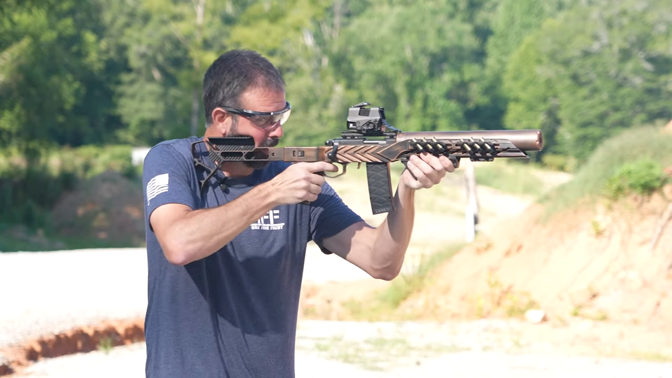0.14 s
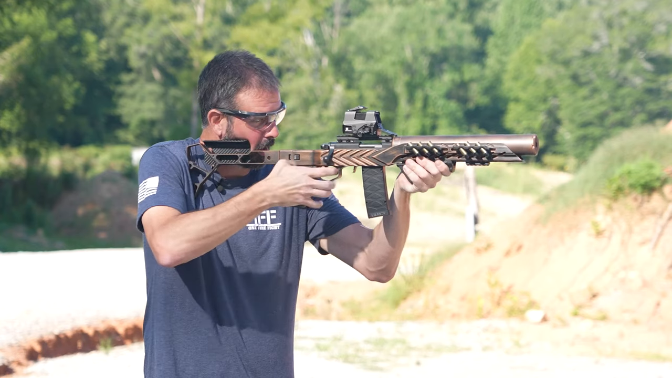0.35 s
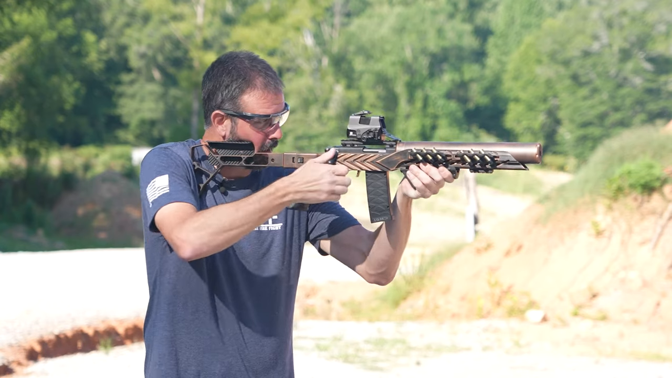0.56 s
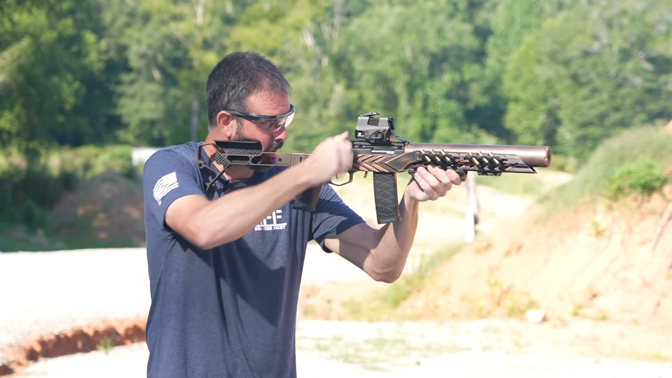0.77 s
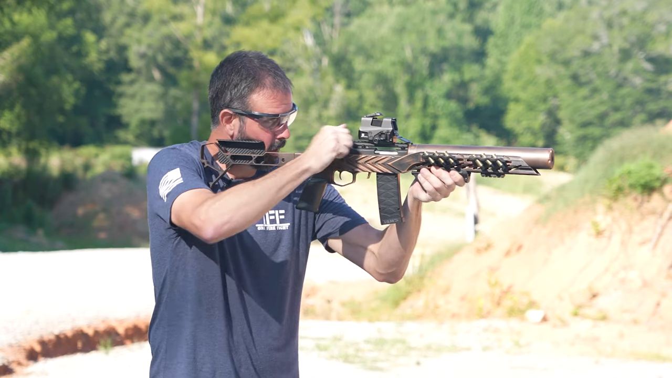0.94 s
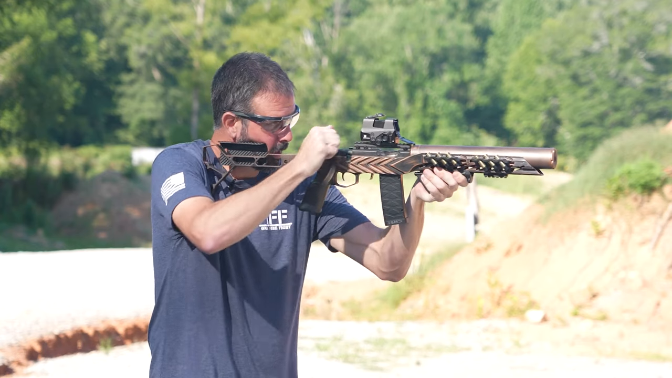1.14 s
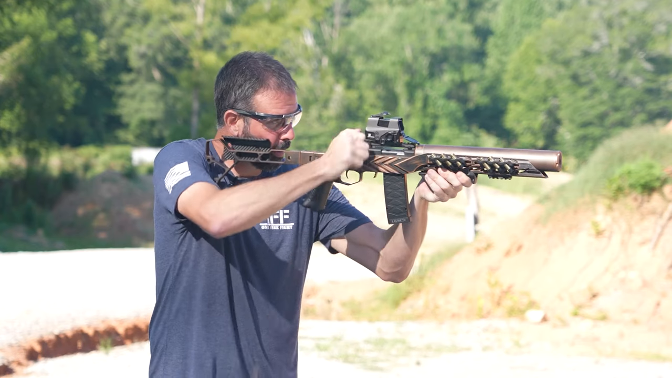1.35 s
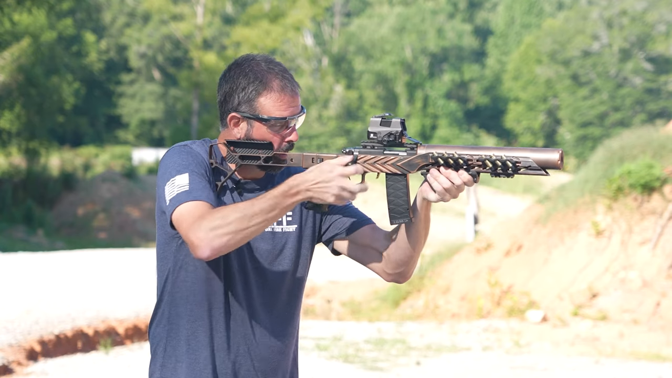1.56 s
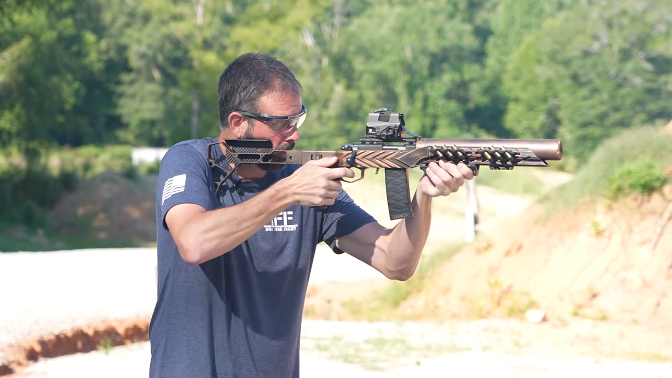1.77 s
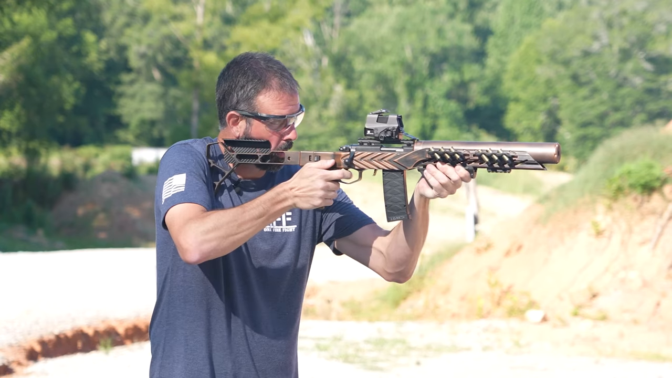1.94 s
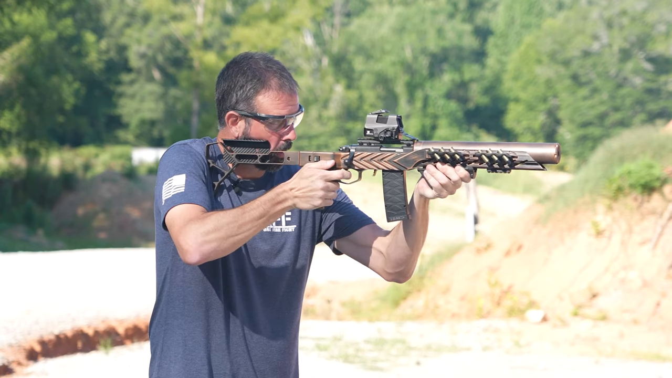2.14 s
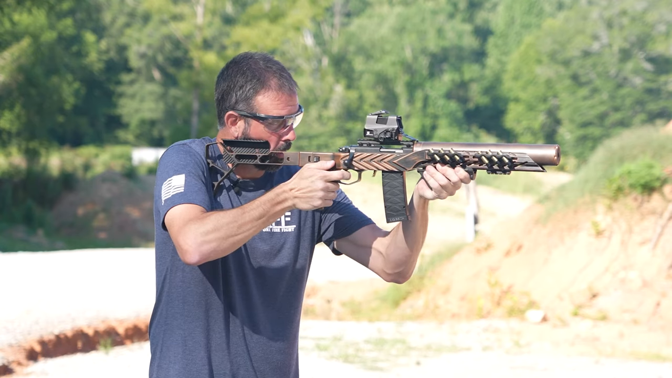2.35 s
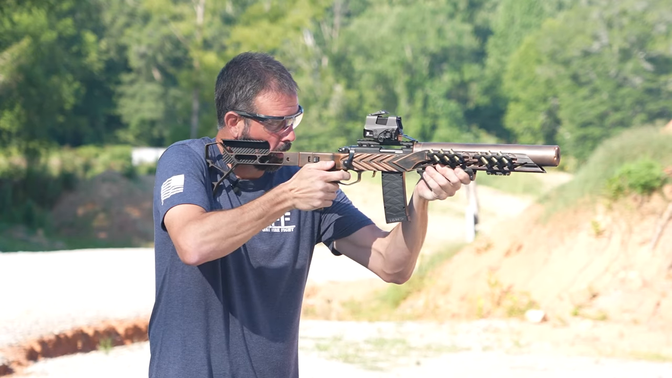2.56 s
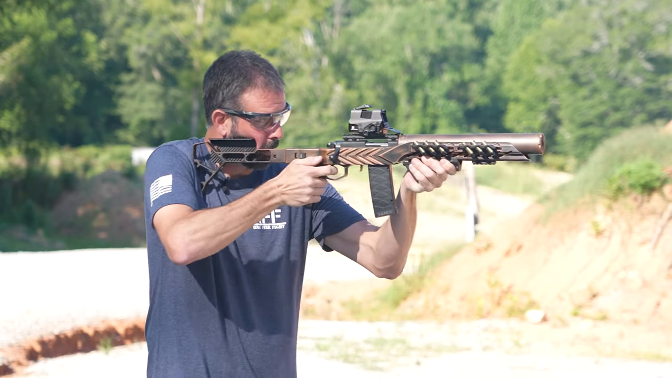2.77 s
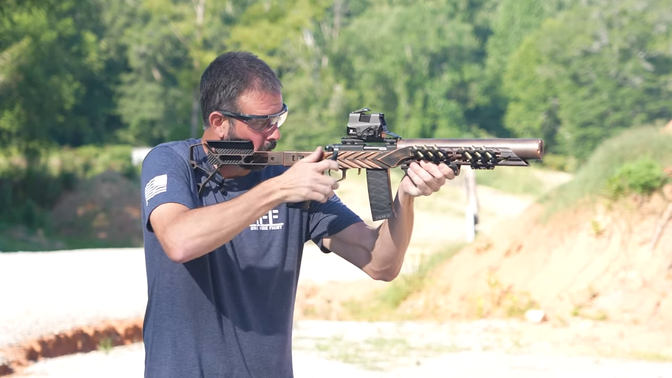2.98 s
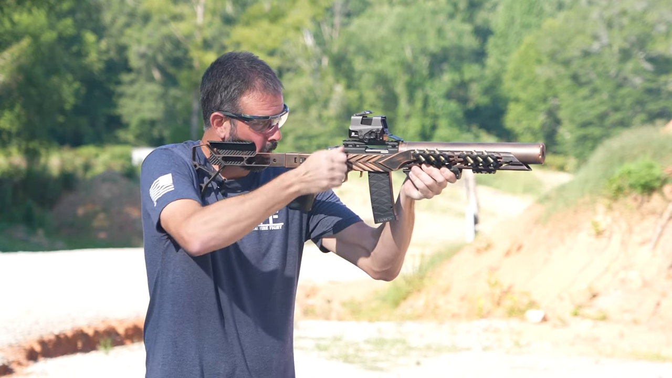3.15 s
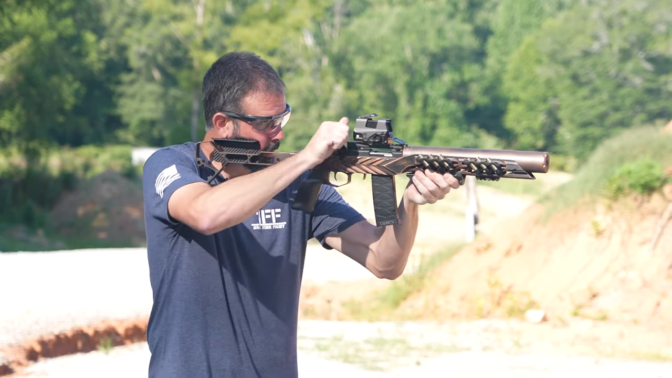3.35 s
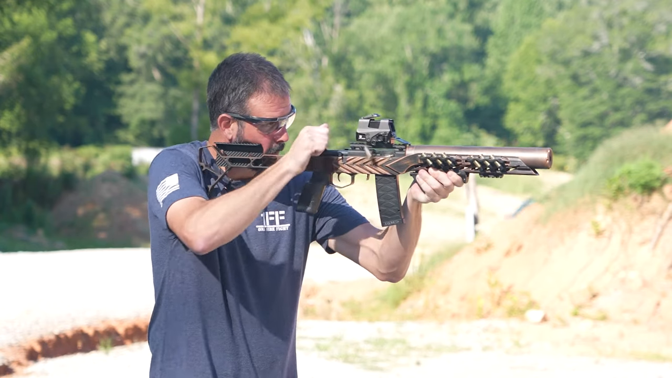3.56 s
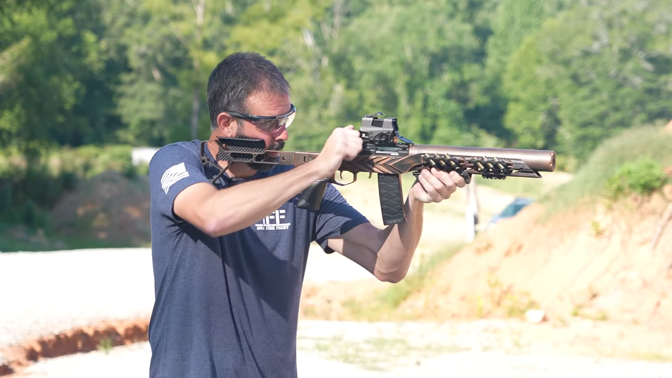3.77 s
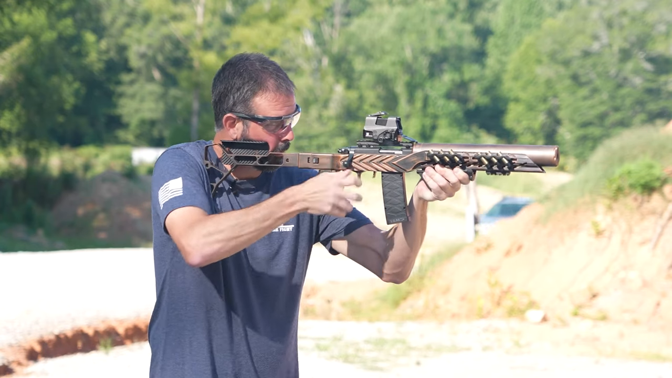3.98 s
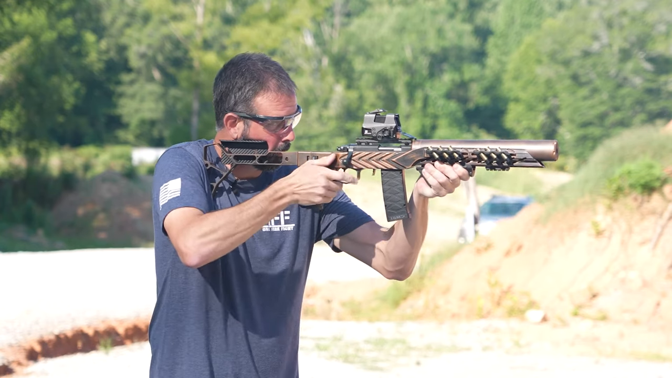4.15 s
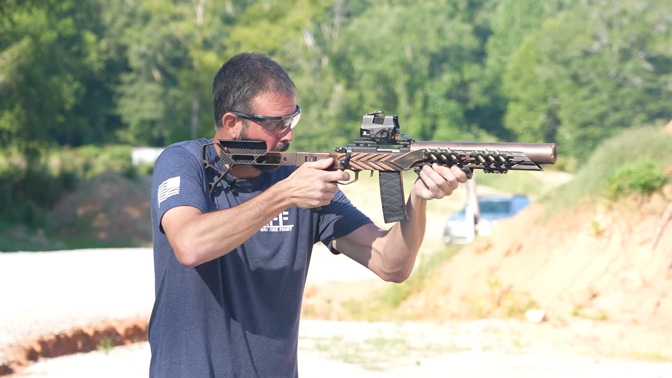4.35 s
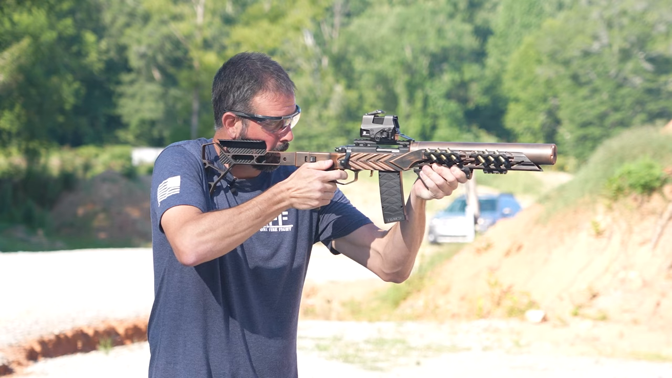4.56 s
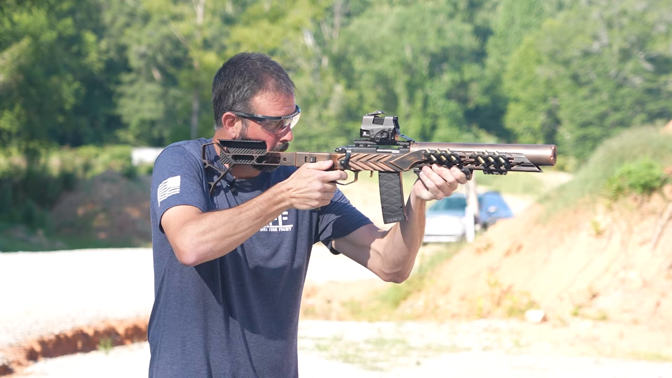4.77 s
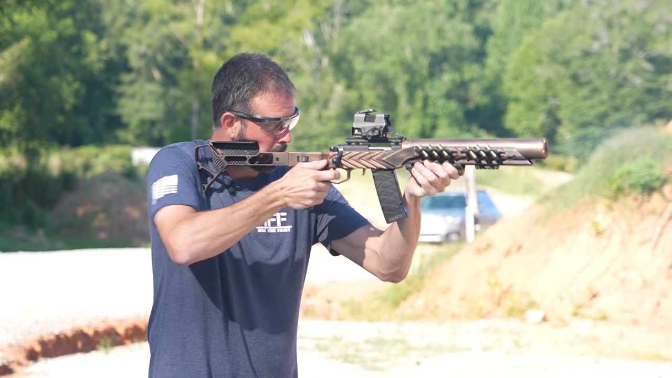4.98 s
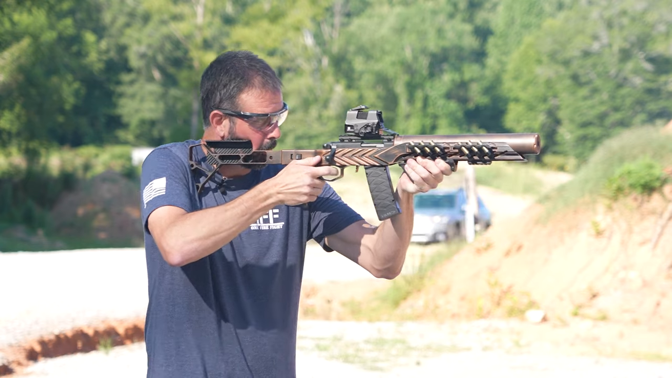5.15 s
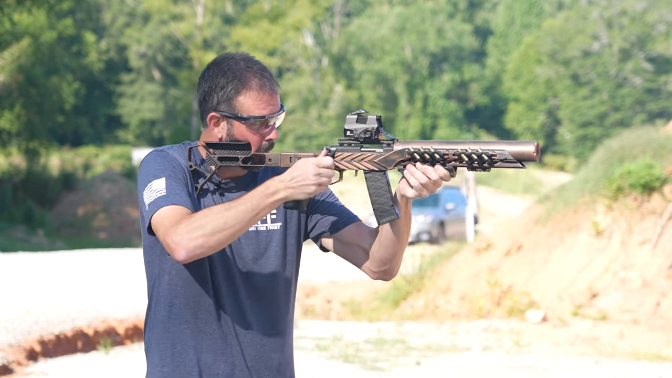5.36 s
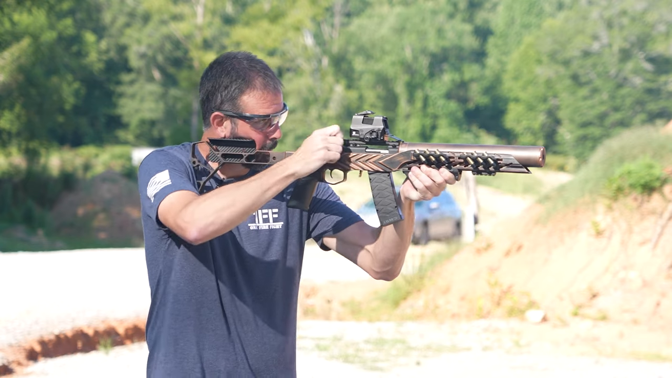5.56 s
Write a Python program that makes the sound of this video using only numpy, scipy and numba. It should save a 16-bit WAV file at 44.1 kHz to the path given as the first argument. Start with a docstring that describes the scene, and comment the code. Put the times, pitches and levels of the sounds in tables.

```python
"""Suppressed rifle, steel plate

A bolt-action rifle fires three times on an outdoor range; each gas blast hisses back from earth banks.
The bullet cracks on a hanging plate, which rings as it swings. The worked bolt scrapes, clicks and
rings the action; the spent case clinks as it lands. A bird, distant traffic and insects lie underneath.
A limiter pumps after each blow."""
import sys
import numpy as np
from scipy import signal
from scipy.fft import rfft, irfft, next_fast_len
from scipy.io import wavfile
from scipy.ndimage import uniform_filter1d
from numba import njit

SR = 44100
rng = np.random.default_rng(int(sys.argv[2]) if len(sys.argv) > 2 else 0)


def to_wav(s):
    """Save 16-bit WAV."""
    ch = np.atleast_2d(s).T  # columns
    pcm = np.round(np.clip(ch, -1, 1) * 32767)  # PCM
    wavfile.write(sys.argv[1], SR, pcm.astype(np.int16))


N = 247842

# reports: start_s, blast_db, blast_t60_s, thump_db, slap_db, near_echo_db, far_hiss_db, far_t60_s
SHOTS = [(0.048, 5.5, 0.16, -1, -6.5, 5.5, -14, 1.2), (2.6854, 7, 0.068, -20, -33, -4, -18, 0.74),
         (5.031, 6.5, 0.093, -17, -20, -3.5, -19.5, 0.94)]
# bullet strikes: start_s, crack_db, wash_db, wash_t60_s, late_echo_db, late_t60_s
STRIKES = [(0.231, 15, -21, 1.57, -15.5, 0.49), (2.868, 6.5, -21.5, 1.65, -16.5, 0.47),
           (5.213, 7.5, -21, 1.95, -3, 0.21)]
# three long plate partials: pitch_hz
LONG_HZ = [872.7, 1333.3, 3638.]
# lowest long partial as the plate swings, one list per strike: time_s, level_db
SWINGS = [
    [(.231, -20), (.87, -19), (1.15, -25.5), (1.4, -27.5), (1.6, -33.5), (1.9, -38), (2.68, -46),
     (2.86, -55)],
    [(2.868, -16), (3.0, -12), (3.15, -14), (3.45, -9.5), (3.65, -22.5), (3.88, -24), (4.15, -32),
     (5.2, -41)],
    [(5.212, -16), (5.3, -12.5), (5.5, -13.5), (5.62, -11)],
]
# upper two long partials: rise_db, t60_s, tail_db, tail_t60_s, level_db per strike
BLOOMS = [(16, 1.254, -25.5, 3., -9, -13.5, -11), (4.1, 0.5, -39.5, 1.8, -3, -5.5, -7.5)]
# short plate partials: pitch_hz
SHORT_HZ = [2047, 2142, 2394, 2701, 4198, 4511, 4604, 4958, 5401, 5880, 6605, 6704, 9738, 13220]
# their decay and beating: t60_s, beat_hz, level_db per strike
SHORT_PARTIALS = [(0.63, 4.1, -22.5, -12.5, -15), (0.8, 1.7, -12, -18, -23), (0.36, 1.2, -7.5, -13.5, -17),
                  (0.85, 2, -6, -21.5, -12.5), (0.79, 5., -19, -10, -16), (0.19, 3.4, -5, -15, -24),
                  (0.77, 2.5, -17, -24.5, -12.5), (0.82, 4.9, -24, -15.5, -12.5),
                  (0.58, 7.5, -16, -16, -16.5), (0.56, 8., -21.5, -12, -11), (0.61, 1.4, -28, -23, -23),
                  (0.99, 4.5, -26, -23, -23), (0.69, 6., -26, -30.5, -30), (.6, 1.6, -40, -38, -40)]

# scrape left by each working of the bolt: start_s, level_db
HANDLING = [(0.838, -32), (3.27, -27.5)]
# bolt strokes: peak_s, scrape_db, hiss_db
STROKES = [(.93, -42, -52), (1.05, -25, -35), (1.3, -28, -51), (3.53, -16, -51), (3.77, -27.5, -42),
           (5.58, -34, -44.5)]
# cloth on the moving arm: start_s, length_s, level_db
RUSTLES = [(.84, 0.99, -58), (3.25, 0.87, -56.5), (4.056, 0.164, -52.5)]
# clicks of bolt, handle and cartridge: start_s, level_db, relative_treble_db
CLICKS = [(.705, -38, 8), (0.7256, -3, -14.5), (0.825, -23.5, -14), (0.8789, -7, 8.5), (.886, 0.5, 2),
          (0.907, 3.5, -7.5), (.954, -20, -22), (1.0014, -7.5, -38.5), (1.0095, -5, -8), (1.0185, -9, -6),
          (1.035, -7.5, 3), (1.044, -4, -6), (1.054, -6, -29), (1.0633, -2, -28), (1.069, 3, -14),
          (1.0759, 12.5, 0), (1.13, -18, -36), (1.2141, -18, -24), (1.261, -13.5, -22.5), (1.28, -14, -14),
          (1.288, -11, -25), (1.294, 4, -8.5), (1.307, 0.5, -21.5), (1.312, 1, -14), (1.3193, 1, -2),
          (1.3353, 13, -3), (1.419, -25, -33), (1.4848, -14, -1), (1.4915, 2.5, -25.5), (1.555, -0.5, -2.5),
          (1.646, -26, -37), (1.7049, -29.5, 3.5), (1.7439, -40.5, -15), (1.812, -40, 5),
          (1.8703, -44.5, -22), (1.879, -51, 6), (1.889, -50.5, 3), (1.954, -54, 4), (3.252, -10, -23),
          (3.3507, -6, 3), (3.3608, 3.5, 1.5), (3.3959, 1, -12), (3.455, -11, -11), (3.474, 1, -13),
          (3.488, -9, -4), (3.5057, -15, 5), (3.5094, 2, -2.5), (3.524, 3, -9), (3.532, -1.5, -17),
          (3.543, 12, -3.5), (3.592, -9.5, -36.5), (3.674, -20.5, -30), (3.7066, -8.5, -27),
          (3.724, -13.5, -29), (3.7389, 1, -12), (3.7505, -13, -15.5), (3.764, -4, -17), (3.7684, 2.5, -6),
          (3.773, -2.5, -15), (3.794, 6.5, -1.5), (3.8352, -32, -17), (3.916, -17.5, -5),
          (3.921, -1.5, -19), (3.9765, 1, -1.5), (4.0688, -30, -35), (4.1905, -37, 5), (4.383, -48, -24),
          (4.6, -60, 8), (5.425, -11.5, -37), (5.55, -14, 9), (5.559, 8.5, -1.5), (5.572, -7, -18),
          (5.5772, 0, -9)]
# spectral peaks of the bolt noise: centre_hz, width_hz, relative_db
MID_BANDS = [(810, 270, -10), (1024, 130, -1), (2180, 980, -1.5), (2652, 230, 9.5), (3720, 1200, -6),
             (4074, 1200, -31)]
TREBLE_BANDS = [(8660, 3000, -5), (11020, 1700, 10.5), (14000, 6000, 2)]
# spent case bouncing on gravel: start_s, end_s
CASE_BOUNCES = [(1.6, 2.1), (4.2, 4.4)]
# modes of action and spent case: pitch_hz
METAL_HZ = [748, 1710, 2132, 2710, 2935, 3795, 4370, 4474, 5190, 5490, 6178, 7104, 7375, 8306, 8352, 9595,
            10380, 12250]
# their decay and level by contact: t60_s, handle_db, rear_stop_db, breech_db, lugs_db, case_db
METAL_MODES = [(0.12, 4, 13.5, 7.5, 7.5, -43.5), (0.13, -14.5, -5, -9, -11.5, -40),
               (0.24, -3, 2.5, -10.5, 2.5, -10), (0.37, -21.5, -18, -14, -16, -31.5),
               (0.11, -20, -5.5, -9.5, -7, -40), (0.18, -26.5, -10.5, -8.5, -36.5, -40),
               (0.27, -25.5, -19, -11, -25, -40), (0.19, -17.5, -23.5, -11, -15.5, -40),
               (0.21, -22.5, -9.5, -15.5, -17, -29), (0.2, -31.5, -22, -25.5, -31.5, 4.5),
               (0.23, -37, -28.5, -14, -27, -42), (0.14, -15, -11, -29, -22, -29),
               (0.49, -35, -32.5, -28.5, -27, -22), (0.22, -30, -17.5, -10.5, -29, -40),
               (0.18, -5, -25, -29.5, -40, -42), (0.43, -20.5, -28.5, -25.5, -28.5, -33),
               (0.38, -29, -21, -29, -30.5, -26), (0.17, -36.5, -1.5, -31.5, -49, -3)]
# bolt stops and case landings, one list per contact in that order: start_s, level_db, free_ring_s
IMPACTS = [
    [(.886, -16.5, 0.025), (.908, -19.5, 0.1), (3.361, -13, 0.029), (3.396, -21, 0.076),
     (5.56, -18.5, 0.058)],
    [(1.085, -15.5, 0.12), (3.55, -23, .115)],
    [(1.336, -10, 0.24), (3.794, -11.5, 0.12)],
    [(1.49, -23, 0.092), (1.555, -23, .3), (3.921, -26, 0.072), (3.977, -21.5, 0.34)],
    [(1.879, -60, 0.1), (4.19, -39, .3)],
]

# bird notes: start_s, length_s, first_hz, middle_hz, last_hz, level_db
BIRD_NOTES = [(1.77, .04, 3650, 3840, 3200, -58), (1.82, .04, 3050, 2730, 2450, -60),
              (1.94, 0.043, 2620, 2620, 2780, -54), (1.976, .03, 2800, 3250, 4120, -58.5),
              (4.446, .038, 2750, 3270, 3700, -62), (4.496, 0.027, 3660, 3400, 3030, -61),
              (4.533, 0.044, 2720, 2700, 2260, -55), (4.608, 0.033, 2290, 2250, 2240, -60),
              (4.69, 0.051, 2620, 2940, 2300, -58.5), (4.741, 0.042, 2690, 2920, 2450, -58.5)]
# noise spectra: frequency_hz, relative_density_db
BLAST_SPECTRUM = [(35, -39.5), (60, -14), (698, -7), (1340, -16.5), (1580, -4.5), (2190, -12), (2650, 1.5),
                  (3190, -11), (3760, -8.5), (11000, -12.5), (16000, -33.5)]
ECHO_SPECTRUM = [(35, -44), (60, -17), (202, -8.5), (732, -11), (882, -9), (1090, -10.5), (1860, -11),
                 (2840, -5), (4970, -3), (11800, -6), (16000, -17.5)]
CRACK_SPECTRUM = [(200, -12), (700, -4.5), (2200, 7), (5000, -2), (16000, -24)]
WASH_SPECTRUM = [(100, -30), (400, -5.5), (1200, 1.5), (3000, 4), (6000, -1), (10000, -13.5),
                 (16000, -26.5)]
LATE_ECHO_SPECTRUM = [(3000, -28), (6000, -7), (9000, 3), (13000, -0.5), (16000, -18.5)]
OUTDOOR_SPECTRUM = [(25, -17), (50, -10), (100, -3.5), (170, -1), (260, -9.5), (500, -11.5), (800, -18),
                    (1300, -25), (2000, -33.5), (2600, -28.5), (4200, -33), (5500, -28.5), (6800, -39.5),
                    (16000, -46.5)]


def rifle():
    """Gas blast from the suppressor, a thump and slap off the bank, hiss from banks and trees."""
    bank_delay_s, strike_delay_s, thump_hz = .067, .184, 310
    gap_db = -10.5  # far hiss until the bank answers
    blast = coloured(BLAST_SPECTRUM)
    hiss = coloured(ECHO_SPECTRUM) * undb(.83 * walk(250) + 1.5 * walk(40))
    out = np.zeros(N)
    for start_s, blast_db, t60_s, thump_db, slap_db, near_db, far_db, far_t60_s in SHOTS:
        bank_s = start_s + bank_delay_s
        t, on = since(start_s)
        bank_t, answered = since(bank_s)
        out += undb(blast_db) * fade(start_s, t60_s, rise_s=.0029) * blast
        out += undb(thump_db) * fade(bank_s, t60_s=.024) * np.sin(2 * np.pi * thump_hz * bank_t)
        slap = undb(slap_db) * fade(bank_s, t60_s=.011, rise_s=.00027)
        near = undb(near_db) * swell(t, rise_db=7, peak_s=.022, t60_s=.045)
        far = (t < strike_delay_s) * undb(far_db + np.where(answered, -60 * bank_t / far_t60_s, gap_db))
        # steps down, then swells just before the strike
        far *= undb(np.interp(t, [.13, .14, strike_delay_s - .028, strike_delay_s], [0, -3.5, -3.5, 3.5]))
        out += (slap + on * (near + far)) * hiss
    return out


def bullet_strikes():
    """Each bullet cracks on the steel; a wash of far echoes and a bright late echo follow."""
    crack, wash, late = map(coloured, (CRACK_SPECTRUM, WASH_SPECTRUM, LATE_ECHO_SPECTRUM))
    out = np.zeros(N)
    for start_s, crack_db, wash_db, wash_t60_s, late_db, late_t60_s in STRIKES:
        out += undb(crack_db) * fade(start_s, t60_s=.012, rise_s=.00037) * crack
        out += undb(wash_db) * fade(start_s, wash_t60_s, rise_s=.0297) * wash
        out += undb(late_db) * fade(start_s, late_t60_s, rise_s=.11) * late
    return out


def plate_ring():
    """Long partials: the lowest wavers with the swing, two bloom. Short ones beat as close pairs."""
    beat_depth, shimmer_db = .72, 1.6
    out = np.zeros(N)
    for strike, ((start_s, *_), swing) in enumerate(zip(STRIKES, SWINGS)):
        t, on = since(start_s)
        gains = [undb(np.interp(t + start_s, *np.transpose(swing), right=-120))]
        for rise_db, t60_s, tail_db, tail_t60_s, *levels_db in BLOOMS:
            bloom = swell(t, rise_db, peak_s=.099, t60_s=t60_s)
            tail = undb(tail_db - 60 * t / tail_t60_s)
            gains.append(undb(levels_db[strike]) * (bloom + tail))
        for hz, gain in zip(LONG_HZ, gains):
            out += on * gain * np.sin(2 * np.pi * hz * t)
        t = np.arange(int(1.5 * SR)) / SR
        for hz, (t60_s, beat_hz, *levels_db) in zip(SHORT_HZ, SHORT_PARTIALS):
            beat = np.abs(1 + beat_depth * np.exp(2j * np.pi * beat_hz * t))
            gain = undb(levels_db[strike] - 60 * t / t60_s + shimmer_db * walk(20, len(t)))
            add(out, start_s, gain * beat * np.sin(2 * np.pi * hz * t))
    return out


def bolt():
    """Noise with a mid peak and a bright treble peak feeds scrapes, clicks and ticks."""
    band_pass = signal.butter(2, (500, 6000), "band", fs=SR, output="sos")
    mids = resonances(signal.sosfilt(band_pass, rng.standard_normal(N)), MID_BANDS)
    mids /= rms(mids.sum(axis=0))
    treble = resonances(rng.standard_normal(N), TREBLE_BANDS).sum(axis=0)
    treble /= rms(treble)
    return friction(mids.sum(axis=0), treble) + clicks(mids, treble) + case_ticks(treble)


def friction(mid, treble):
    """Metal slides on metal; cloth rustles as the arm moves."""
    rise_db_per_s, fall_db_per_s = 329, 700.5
    t = np.arange(N) / SR
    scrape = sum(undb(db) * fade(start_s, t60_s=1.89, rise_s=.06) for start_s, db in HANDLING)
    hiss = np.zeros(N)
    for start_s, length_s, level_db in RUSTLES:
        add(hiss, start_s, undb(level_db) * signal.windows.tukey(int(length_s * SR), .3))
    for peak_s, scrape_db, hiss_db in STROKES:
        stroke = undb(np.minimum(rise_db_per_s * (t - peak_s), fall_db_per_s * (peak_s - t)))
        scrape += undb(scrape_db) * stroke
        hiss += undb(hiss_db) * stroke
    return mid * scrape * undb(walk(130)) + treble * hiss * undb(2.2 * walk(65))


def clicks(mids, treble):
    """Dry metal snaps, each coloured at random; treble dies first, the strongest band rings on."""
    rise_s, t60_s, treble_decay_ratio = .00076, .025, 1.35
    tail_db, tail_t60_s, colour_spread_db = -14, .067, 3.1
    strongest = mids[np.argmax(np.array(MID_BANDS)[:, 2])]
    colours = undb(colour_spread_db * rng.standard_normal((len(CLICKS), len(mids))))
    out = np.zeros(N)
    for (start_s, level_db, treble_db), colour in zip(CLICKS, colours):
        span = slice(int(start_s * SR), int(start_s * SR) + int(.1 * SR))
        t = np.arange(len(out[span])) / SR
        decay_db = -60 * t / t60_s
        snap = colour @ mids[:, span] * undb(decay_db)
        tail = strongest[span] * undb(tail_db - 60 * t / tail_t60_s)
        edge = treble[span] * undb(treble_db + treble_decay_ratio * decay_db)
        out[span] += undb(level_db) * (1 - np.exp(-t / rise_s)) * (snap + tail + edge)
    return out


def metal_ring():
    """Bolt stops and recoil ring the action; the spent case clinks as it lands. Each is then damped."""
    rise_s, shimmer_db, damping_s, damped_db = .011, 2.2, .0061, -17.5
    rear_stop, recoil_db, recoil_ring_s = 1, -29.5, .15
    recoils = [(start_s, recoil_db, recoil_ring_s) for start_s, *_ in SHOTS]
    t = np.arange(int(.5 * SR)) / SR
    out = np.zeros(N)
    for contact, impacts in enumerate(IMPACTS):
        for start_s, level_db, free_s in impacts + (recoils if contact == rear_stop else []):
            ring = np.zeros(len(t))
            for hz, (t60_s, *levels_db) in zip(METAL_HZ, METAL_MODES):
                gain = undb(levels_db[contact] - 60 * t / t60_s + shimmer_db * walk(68, len(t)))
                ring += gain * np.sin(2 * np.pi * hz * t)
            damping_db = np.interp(t, [free_s, free_s + damping_s], [0, damped_db])
            add(out, start_s, undb(level_db + damping_db) * (1 - np.exp(-t / rise_s)) * ring)
    return out


def case_ticks(treble):
    """Faint bright ticks as the spent case bounces on gravel."""
    ticks_per_s, floor_db, spread_db = 25, -60.5, 4
    out = np.zeros(N)
    for start_s, end_s in CASE_BOUNCES:
        for position, chance in rng.random((int(ticks_per_s * (end_s - start_s)), 2)):
            tick_s = start_s + position * (end_s - start_s)
            out += undb(floor_db - spread_db * np.log(chance)) * fade(tick_s, t60_s=.012, rise_s=.0005)
    return out * treble


def bird():
    """Short far whistles, each arching through three pitches."""
    out = np.zeros(N)
    for start_s, length_s, first_hz, middle_hz, last_hz, level_db in BIRD_NOTES:
        progress = np.arange(0, length_s, 1 / SR) / length_s
        arch_hz = (middle_hz - (first_hz + last_hz) / 2) * (1 - (2 * progress - 1) ** 2)
        pitch_hz = first_hz + (last_hz - first_hz) * progress + arch_hz
        whistle = np.sin(2 * np.pi * np.cumsum(pitch_hz) / SR)
        add(out, start_s, undb(level_db) * signal.windows.tukey(len(whistle), .4) * whistle)
    return out


def outdoors():
    """Distant traffic and insects as one slowly drifting noise bed."""
    return undb(-48.5 + walk(rate_hz=1.9)) * coloured(OUTDOOR_SPECTRUM)


def undb(db):
    return 10 ** (np.asarray(db) / 20)


def rms(x):
    return np.sqrt(np.mean(x ** 2))


def coloured(spectrum):
    """Unit-rms noise with the given spectrum."""
    hz, db = np.transpose(spectrum)
    size = next_fast_len(N)
    bins_hz = np.arange(1, size // 2 + 2) * SR / size
    gain = undb(np.interp(np.log(bins_hz), np.log(hz), db))
    noise = irfft(rfft(rng.standard_normal(size)) * gain, size)[:N]
    return noise / rms(noise)


def resonances(x, bands):
    """x through parallel resonators, one row each."""
    return np.array([undb(db) * signal.lfilter(*signal.iirpeak(hz, hz / width_hz, fs=SR), x)
                     for hz, width_hz, db in bands])


def since(start_s):
    """Seconds after start_s, and a gate that opens there."""
    t = np.arange(N) / SR - start_s
    return np.maximum(t, 0), t >= 0


def fade(start_s, t60_s, rise_s=.00095):
    """Rise, then exponential decay."""
    t, on = since(start_s)
    return on * (1 - np.exp(-t / rise_s)) * undb(-60 * t / t60_s)


def swell(t, rise_db, peak_s, t60_s):
    """Climb by rise_db to unity, then decay."""
    return undb(np.minimum(rise_db * (t / peak_s - 1), -60 * (t - peak_s) / t60_s))


def add(out, start_s, sound):
    i = int(start_s * SR)
    out[i:i + len(sound)] += sound[:N - i]


def walk(rate_hz, size=N):
    """Slewed random steps, spread near 1."""
    hold = int(SR / rate_hz)
    return uniform_filter1d(np.repeat(rng.standard_normal(size // hold + 1), hold), hold)[:size]


@njit
def limiter(x, threshold, ratio, catch_s, release_s, lag_s):
    """A detector catches peaks and lets go slowly; the gain lags it."""
    out, envelope, gain = np.empty(len(x)), 0., 1.
    for i in range(len(x)):
        follow_s = catch_s if abs(x[i]) > envelope else release_s
        envelope += (abs(x[i]) - envelope) / (follow_s * SR)
        target = min(1., (threshold / (envelope + 1e-9)) ** (1 - 1 / ratio))
        gain += (target - gain) / (lag_s * SR)
        out[i] = x[i] * gain
    return out


def scene():
    """Mono sum of all sources."""
    background = outdoors()
    return (rifle() + bullet_strikes() + plate_ring() + bolt() + metal_ring() + bird() + background)[None]


def record(dry):
    """Microphone roll-off, limiter, soft clip of the blows it is late for, steep top cut."""
    mic_hz, top_hz, ceiling = 16100, 15900, .53
    heard = signal.sosfilt(signal.butter(4, mic_hz, fs=SR, output="sos"), dry[0])
    held = limiter(heard, threshold=.2, ratio=7.5, catch_s=.00045, release_s=.015, lag_s=.0019)
    rounded = held / (1 + (np.abs(held) / ceiling) ** 4) ** (1 / 4)
    return signal.sosfilt(signal.ellip(10, .2, 70, top_hz, fs=SR, output="sos"), rounded)[None]


dry = scene()
out = record(dry)
to_wav(out)
```